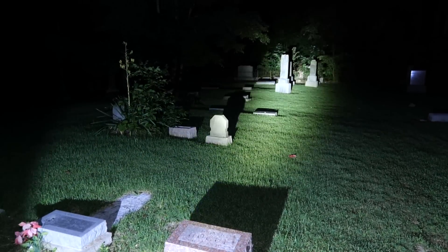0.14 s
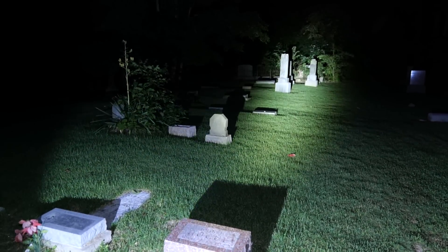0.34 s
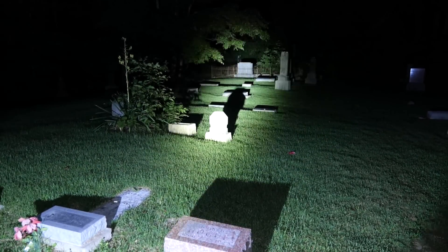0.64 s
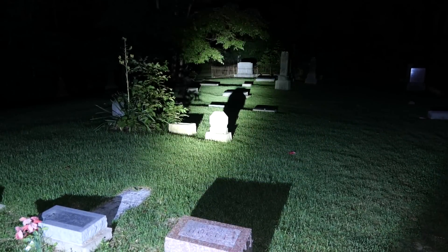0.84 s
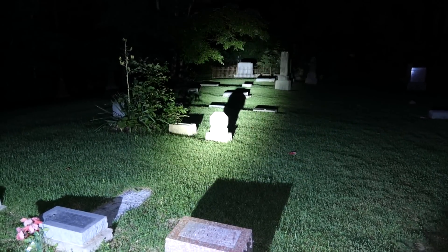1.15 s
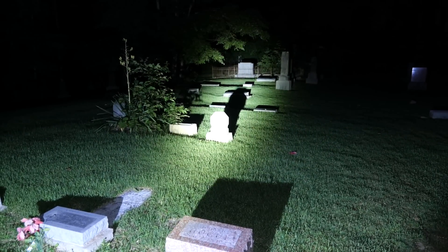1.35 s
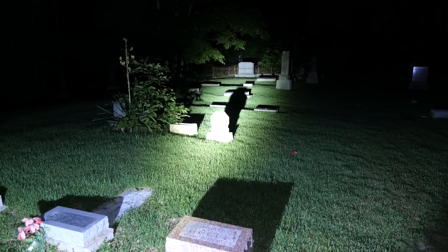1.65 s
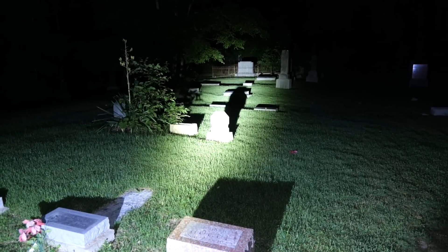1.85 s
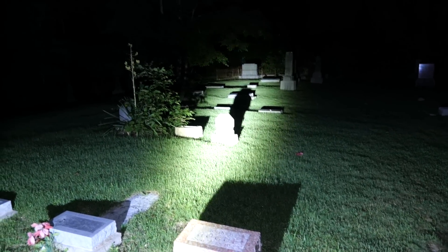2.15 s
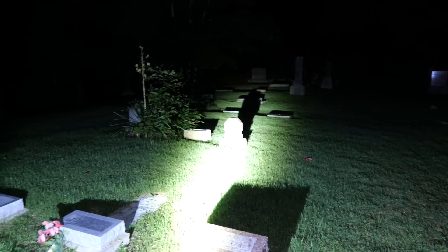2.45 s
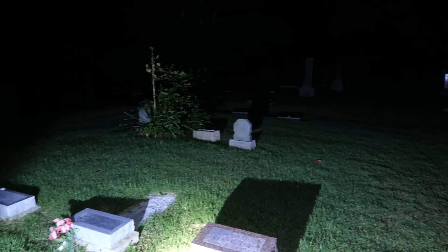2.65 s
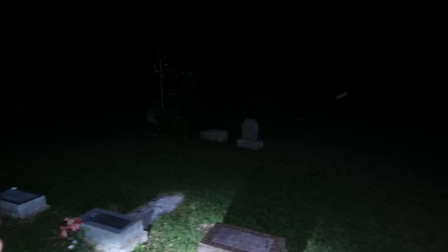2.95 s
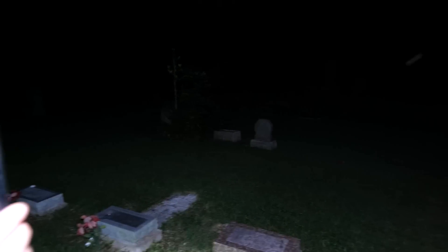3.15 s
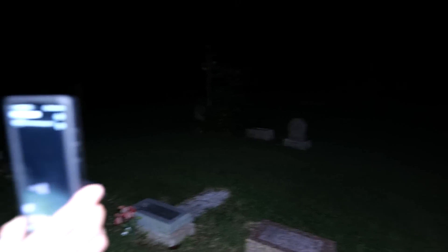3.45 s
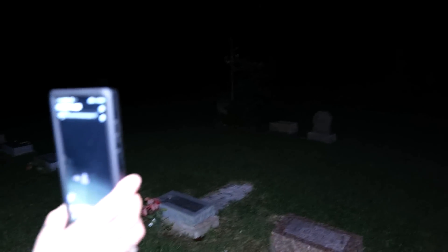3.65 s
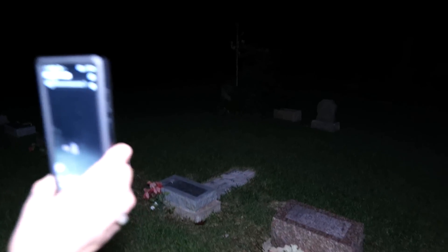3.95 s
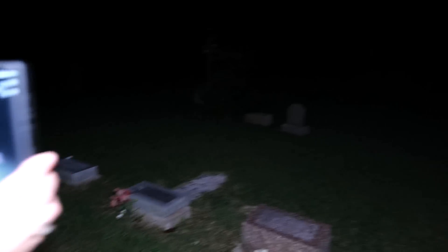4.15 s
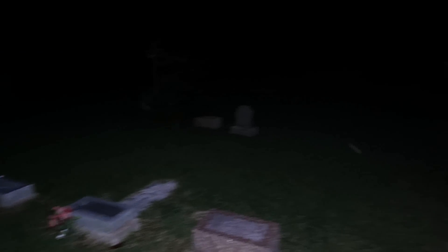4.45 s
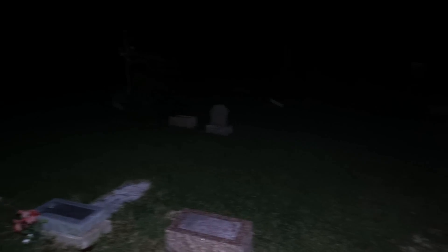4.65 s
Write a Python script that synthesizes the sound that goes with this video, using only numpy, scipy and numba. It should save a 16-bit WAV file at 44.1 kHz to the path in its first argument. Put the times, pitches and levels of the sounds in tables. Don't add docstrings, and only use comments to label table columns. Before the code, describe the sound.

From 0 to about 4.8 s a dense night chorus of crickets fills a lawn edged by trees. The strongest layer is a steady, fluttering trill around 2 to 3 kHz; higher crickets shimmer above it, with small rhythmic chirps pulsing nearly three times a second and brief field trills coming and going. Distant katydids rasp softly, often in pairs, notably around 0.05-0.25, 1.5-1.7, 2.9 and 3.9-4.1 s. A nearer katydid makes a bright, dry buzz of six rapid pulses from 2.5 to 3.0 s, then three more from 4.6 s to the end. Beneath lies a faint, dull road roar with wavering engine hum, swelling briefly near 4.1 s. Very faint hand creaks occur around 3.0-3.3 s and a tiny tick at 4.24 s. The camera's narrow stereo adds light hiss and thinned treble, with a short leafy outdoor tail.

```python
import sys
import numpy as np
from scipy import signal
from scipy.fft import rfft, irfft
from scipy.io import wavfile
from scipy.ndimage import uniform_filter1d
from numba import njit

SR = 44100
rng = np.random.default_rng(int(sys.argv[2]) if len(sys.argv) > 2 else 0)


def transcribe(signal):
    frames = np.atleast_2d(signal).T
    limited = np.clip(frames, -1, 1)
    pcm = np.round(limited * 32767).astype(np.int16)
    wavfile.write(sys.argv[1], SR, pcm)


def volts(x):
    e = np.asarray(x, float) / 20
    return 10 ** e


N = 211981

SEAM_HZ, SEAM_WIDTH_HZ = 7420, 160


def level(x, db):
    return x * volts(db) / np.sqrt(np.mean(x ** 2))


def columns(table):
    s, *rest = np.transpose(table)
    return [np.interp(np.arange(N) / SR, s, c) for c in rest]


def along_hz(points):
    hz, value = np.transpose(points)
    return np.interp(np.log(np.fft.rfftfreq(N, 1 / SR) + 1), np.log(hz), value)


def colour(x, points, lo_hz=1, hi_hz=20000):
    (lo, _), (hi, _) = points[0], points[-1]
    hz = np.fft.rfftfreq(N, 1 / SR)
    gain = volts(along_hz([(lo * .97, -80), *points, (hi * 1.01, -80)]))
    return irfft(rfft(x) * gain * (hz > lo_hz) * (hz < hi_hz), N)


def ring(x, hz, width_hz):
    return signal.lfilter(*signal.iirpeak(hz, hz / width_hz, fs=SR), x)


def pan(db):
    return np.array([[db], [-db]]) / 2


def arch(s, length_s):
    return np.sin(np.pi * np.clip((np.arange(N) / SR - s) / length_s, 0, 1))


def swell(s, rise_s, fall_s):
    t = np.arange(N) / SR - s
    return np.exp(-.5 * (t / np.where(t < 0, rise_s, fall_s)) ** 2)


def walk(rate):
    k = int(SR / rate)
    steps = np.repeat(rng.standard_normal(N // k + 1), k)
    return 1.3 * uniform_filter1d(uniform_filter1d(steps, k), k)[:N]


def air():
    # pitch_hz, likeness [0-1]
    likeness = [(25, .8), (60, 1), (300, 0.96), (700, 0.91), (1400, 0.64), (2500, 0.52), (6000, 0.85),
                (7600, 0.7), (9500, 0.86), (11000, 0.36), (15000, 0.06)]
    like = np.clip(along_hz(likeness), 0, 1)
    mid, side = rfft(rng.standard_normal((2, N))) * np.sqrt([1 + like, 1 - like])
    return irfft(np.array([mid + side, mid - side]), N) / 2


def echoes(x, t60_s, db, spread=0.42):
    t = np.arange(SR // 2) / SR
    noise = rng.standard_normal((2, len(t))) * np.array([[1], [spread]])
    dull = signal.lfilter(*signal.butter(2, 10500, fs=SR), noise)
    tail = dull * 1000. ** (-t / t60_s) + (noise - dull) * 1000. ** (-t / (.62 * t60_s))
    tail = np.array([tail[0] + tail[1], tail[0] - tail[1]]) * volts(db) / np.sqrt(np.sum(tail ** 2))
    return x + signal.fftconvolve(x.mean(axis=0, keepdims=True), tail, axes=1)[:, :N]


@njit
def wings(hz, rate, duty, fall, lag, chance, n, sr):
    out = np.zeros((2, n))
    for s in range(len(hz)):
        stroke, k = chance[s, 0, 0], 1
        turn = 2 * np.pi * chance[s, 0, 1]
        c, d = np.cos(lag[s]), np.sin(lag[s])
        for i in range(n):
            stroke += rate[s] * (.9 + .2 * chance[s, k, 0]) / sr
            if stroke >= 1:
                stroke, k = stroke - 1, k + 1
                turn = 2 * np.pi * chance[s, k, 1]
            if stroke < duty:
                u = stroke / duty
                turn += 2 * np.pi * hz[s] * (1 - fall * (u + chance[s, k, 0] - 1)) / sr
                size = np.sin(np.pi * u) * (.4 + chance[s, k, 2])
                a, b = size * np.sin(turn) * c, size * np.cos(turn) * d
                out[0, i] += a + b
                out[1, i] += a - b
    return out


def crowd(kind, swell_db, count):
    hz, spread_hz, rate, duty, fall, db, pan_db, lag = kind
    pace, side = rng.standard_normal((2, count))
    rank = (np.arange(count) + .25 + .5 * rng.random(count)) / count
    pitch = np.log(rank / (1 - rank))
    pitch, side = ((v - v.mean()) / (v.std() + 1e-9) for v in (pitch, side))
    paces = rate * (1 + .09 * np.clip(pace, -2, 2))
    chance = rng.random((count, 600, 3))
    song = wings(hz + spread_hz * pitch, paces, min(duty, 1.), 1. * fall, lag / 2 * side, chance, N, 1. * SR)
    return level(song, db) * volts(swell_db - swell_db.mean() + pan(pan_db))


def crickets():
    # pitch_hz, spread_hz, strokes_per_s, sounding_share [0-1], pitch_fall [0-1],
    # level_db, left_minus_right_db, port_lag_spread_rad
    tree_kinds = [(2211.6, 49.4, 51, .6, .03, -30, -0.4, 0.74), (2615, 79, 48, 0.5, 0.01, -40, 1, 0.75),
                  (2914, 77, 65, 0.46, 0.07, -34, -1, 0.85)]
    field_kinds = [(4393, 126, 50, 0.54, 0.032, -45, -1.8, 0.92),
                   (4720, 86, 50, 0.6, 0.025, -47.5, -2, 0.54)]
    ground_kinds = [(5817, 147, 30, 0.41, 0.025, -45, -6, 0.24),
                    (6060, 8.6, 66, 0.58, 0.0033, -62.5, -21, 0.53),
                    (6480, 27, 39, 0.36, 0.014, -67, -18, 0.95)]
    tinkler_kinds = [(7040, 70, 22, .6, .015, -63, -.5, .5)]
    # time_s, effort_db
    tree_effort = [(0, -1.5), (.1, 1), (.45, 1.5), (.6, -.5), (.9, 0), (1.15, -0.5), (1.5, 0), (1.8, -0.5),
                   (2.05, -2), (2.22, 0.5), (2.45, -0.5), (2.6, 0.5), (3., 0), (3.17, -1), (3.4, 0.5),
                   (3.9, -0.5), (4.27, -0.5), (4.81, 1)]
    # peak_s, rise_db
    chirps = [(.33, 3), (.72, 6), (1.1, 2), (1.5, 4.5), (1.88, 7.5), (2.22, 5.5), (2.6, 3.5), (2.95, 5.5),
              (3.3, 7), (3.66, 7), (4.03, 5), (4.4, 8.5), (4.76, 5)]
    # time_s, effort_db
    tinkle_effort = [(0, -19), (1., 3), (1.8, 3), (2.05, 18), (2.5, 12.5), (3.2, 12), (3.7, 13), (4.2, 2),
                     (4.81, -10)]
    # time_s, level_db
    thin_level = [(0, -70), (.4, -59), (1.2, -60), (1.8, -58), (2.7, -61), (3.1, -75), (4.81, -75)]
    # pitch_hz, density_db [dB per Hz]
    wash = [(820, -56), (1400, -31), (1650, -27.5), (1880, -11), (2210, -9), (2470, -7), (2990, -13.5),
            (3610, -27.5), (3970, -37), (4320, -13), (4820, -25), (5170, -25), (5890, -7.5), (6630, -25),
            (7300, -23.5), (9490, -59), (16100, -120)]
    low, high, field, upper = (0.34 * walk(3.92) for _ in range(4))
    ground = sum(db * swell(s, rise_s=.05, fall_s=0.056) for s, db in chirps)
    near = crowd(tree_kinds[0], low + columns(tree_effort)[0], count=19)
    near += crowd(tree_kinds[1], high, count=7)
    near += crowd(tree_kinds[2], high, count=18)
    near += crowd(field_kinds[0], field, count=13)
    near += crowd(field_kinds[1], upper, count=5)
    for kind, count in zip(ground_kinds, (8, 2, 4)):
        near += crowd(kind, ground, count)
    near += crowd(tinkler_kinds[0], columns(tinkle_effort)[0], count=7)
    near += trills()
    thin = volts(columns(thin_level)[0] + 2 + 3 * walk(9))
    thin = thin * np.sin(2 * np.pi * np.cumsum(3393 + 2.5 * walk(5)) / SR)
    blur = level(colour(air(), wash, hi_hz=SEAM_HZ - SEAM_WIDTH_HZ / 2), -36.5)
    return echoes(near, t60_s=.4, db=-10) + thin + blur


def trills():
    # start_s, length_s, pitch_hz, level_db, left_minus_right_db
    trill_events = [(.15, 0.18, 4280, -41, -5), (.66, .24, 4380, -42, -4), (1.1, 0.42, 4790, -44.5, -9),
                    (1.358, 0.33, 4490, -42, -9), (1.72, 0.38, 4760, -44, -5), (2.24, 0.09, 4900, -44, -6),
                    (3.196, 0.44, 4830, -44, -4), (3.62, 0.27, 4550, -40, -8), (3.978, 0.13, 4350, -41, -1),
                    (4.27, .13, 4880, -49, -7), (4.6, .15, 4940, -51, -3)]
    out = 0
    for s, length_s, hz, db, pan_db in trill_events:
        kind = (hz, 20, 45, .82, .017, db - 1.5, pan_db, .6)
        out = out + arch(s, length_s) ** .5 * crowd(kind, np.zeros(1), count=2)
    return out


def scrape(rate, rough):
    phase = np.cumsum(rate * (1 + 0.78 * walk(rate / 2))) / SR % 1
    return air() * (1 - rough + rough * 2 * np.exp(-phase / 1.1))


def far_katydids():
    # pitch_hz, gain_db
    rasp_colour = [(2500, 4), (3300, -5), (4000, -5.5), (5200, -0.5), (6300, -10), (7250, -14.5),
                   (7420, -42), (7600, -27.5), (9000, -24.5), (12000, -17), (15500, -22)]
    # peak_s, level_db, left_minus_right_db, relative_db_around_5.1_khz
    rasps = [(.05, -41, -3, 1), (.25, -41.5, -4, -8), (.81, -47.5, -5, 1), (1.5, -40, 1, 1),
             (1.73, -41.5, 4, -1), (1.92, -53, 1, 0), (2.28, -49, -3, -3), (2.53, -52, -1, -2),
             (2.92, -40.5, 3, 0), (3.33, -62, -3, -9), (3.72, -54, -1, -6), (3.88, -43.5, 1, -2),
             (4.07, -43, -1, 0), (4.5, -53, -3, -2), (4.72, -50, -1, -4)]
    rasp = level(colour(scrape(rate=110, rough=0.15), rasp_colour), 6.0)
    low = ring(rasp, 5100, 1100)
    out = rasp * volts(-49.5 + pan(-2))
    for s, db, pan_db, low_db in rasps:
        syllable = rasp + (volts(low_db - 0.5) - 1) * low
        out += swell(s, rise_s=0.047, fall_s=0.068) * volts(db - 5.5 + pan(pan_db)) * syllable
    return out


def road():
    # pitch_hz, density_db [dB per Hz]
    roar_colour = [(13, -57), (22, -19), (43, -26), (101, 0.5), (119, 1.5), (211, -5), (243, -7.5),
                   (313, -4.5), (473, -15), (653, -17.5), (740, -15.5), (1140, -19.5), (1600, -15),
                   (2080, -12), (3520, -120)]
    # pitch_hz, width_hz, level_db
    engines = [(118.6, 26, -53.5), (157.6, 24.6, -53.5), (207.3, 7.8, -58.5)]
    # time_s, nearness_db
    traffic = [(0, 4.5), (.15, 6.5), (.5, 1.5), (1.25, -4), (2.15, 2.5), (2.6, -3.5), (2.9, 0.5),
               (3.1, 3.5), (3.7, 3), (4., -3.5), (4.55, 2), (4.81, 1.5)]
    # middle_s, half_length_s, pitch_hz, level_db
    engine_pulls = [
        (3.04, .04, 209, -45),
        (4.096, .07, 156.8, -40.5),
        (4.68, 0.078, 212.5, -48),
    ]
    near_db, = columns(traffic)
    t = np.arange(N) / SR
    drone_db = 0.5 * (np.arange(N) - N / 2) / SR + walk(4.38)
    roar = level(colour(air(), roar_colour), -46.5)
    tyres = ring(roar, 340, 310)
    roar += (volts(0.31 * near_db) - 1) * ring(roar, 1300, 1250)
    drones = sum(level(ring(ring(air(), hz, width), hz, width), db) for hz, width, db in engines)
    pulls = 0
    for s, half_s, hz, db in engine_pulls:
        pulls = pulls + volts(db) * swell(s, half_s, half_s) * np.sin(2 * np.pi * hz * t)
    return roar + (volts(near_db + 1.45 * walk(7)) - 1) * tyres + drones * volts(drone_db) + pulls


def near_katydid():
    # pitch_hz, density_db [dB per Hz]
    buzz = [(6000, -32), (6500, -11), (7300, -3), (7520, 1), (8400, 1), (9000, -4), (9800, -3),
            (10500, -5.5), (11900, -5), (13200, -11.5), (15400, -20)]
    # start_s, peak_db, treble_relative_db, left_minus_right_db, lowest_wing_mode_db
    strokes = [
        (2.542, -29.5, -22, -1, 0.5),
        (2.6144, -29.5, -18, -2, -3),
        (2.698, -26, -15.5, 2, -4),
        (2.779, -26, -16.5, 4, -6),
        (2.86, -28, -12, 3, -2),
        (2.939, -25.5, -15, 3, -4.5),
        (4.615, -27, -17, 4.5, -13),
        (4.699, -26, -14.5, 3, -11),
        (4.77, -26.5, -19, 1.0, 0),
    ]
    teeth = level(colour(scrape(rate=330, rough=0.2), buzz), -4.5)
    treble = signal.sosfiltfilt(signal.butter(2, 11500, "high", fs=SR, output="sos"), teeth)
    lowest = signal.sosfiltfilt(signal.butter(16, 7800, fs=SR, output="sos"), teeth)
    t, out = np.arange(N) / SR, np.zeros((2, N))
    for s, db, treble_db, pan_db, low_db in strokes:
        u = np.clip((t - s) / .098, 0, 1)
        speed = np.sin(np.pi * u ** .75)
        stroke = speed ** 1.8 * (teeth - treble + (volts(low_db) - 1) * lowest)
        stroke += speed ** 1.4 * volts(treble_db + 14.5) * treble
        out += stroke * volts(db + pan(pan_db))
    return echoes(out, t60_s=0.71, db=0.44, spread=0.43)


def handling():
    # start_s, length_s, centre_hz, width_hz, level_db
    touches = [
        (3.0, .11, 870, 90, -54),
        (3.02, .09, 550, 80, -61),
        (3.0, .15, 310, 90, -55),
        (3.23, .09, 870, 70, -61),
        (4.24, .008, 1200, 1100, -46),
    ]
    out = 0
    for s, length_s, hz, width, db in touches:
        creak = ring(ring(rng.standard_normal(N), hz, width), hz, width)
        out = out + arch(s, length_s) * level(creak, db)
    return out


def scene():
    return crickets() + far_katydids() + near_katydid() + road() + handling()


def thin_treble(x):
    hole_db, line_db, starve_db, from_hz = -2.5, -2.5, -13, 7250
    edge_hz, spare_hz, spare_share = 15150, 15560, .2
    frame = dict(window="cosine", nperseg=2048, noverlap=1024)
    hz, _, z = signal.stft(np.array([x[0] + x[1], x[0] - x[1]]) / 2, SR, **frame)
    power = np.abs(z) ** 2
    patch = uniform_filter1d(uniform_filter1d(power, size=5, axis=1), size=2, axis=2)
    around = uniform_filter1d(power, size=48, axis=1)
    treble = power[0, (hz > 7500) & (hz < 11000)].mean(axis=0)
    loud = treble > 6 * np.median(treble)
    hz = hz[:, None]
    keep = (patch > around * volts(2 * hole_db - 4 * loud)) & (power > around * volts(2 * line_db))
    keep |= hz < from_hz
    keep &= (patch > treble * volts(2 * starve_db)) | (hz < 3300) | (hz > from_hz)
    edge, spare = rng.random((2, z.shape[2]))
    keep &= (hz < edge_hz + 300 * edge ** 2) | ((abs(hz - spare_hz - 110) < 90) & (spare < spare_share))
    mid, side = signal.istft(z * keep, SR, **frame)[1][:, :N]
    return np.array([mid + side, mid - side])


def band_limit(x):
    return signal.sosfilt(signal.butter(12, 16310, fs=SR, output="sos"), x)


def record(dry):
    # pitch_hz, density_db [dB per Hz]
    hiss_colour = [(4410, -20), (7500, 3.5), (7670, -2), (8990, -2.5), (11100, -4.5), (14700, -3),
                   (15500, 3.5), (15800, -5)]
    hiss = level(colour(air(), hiss_colour, lo_hz=SEAM_HZ + SEAM_WIDTH_HZ / 2), -52.5)
    mix = thin_treble(dry + hiss)
    return band_limit(mix)


dry = scene()
out = record(dry)
transcribe(out)
```